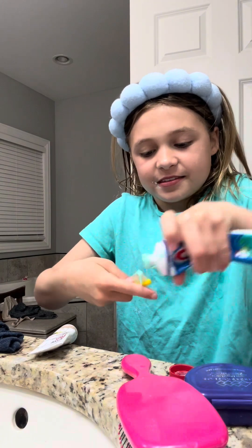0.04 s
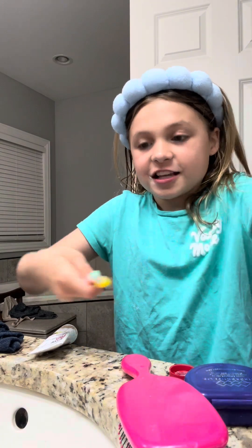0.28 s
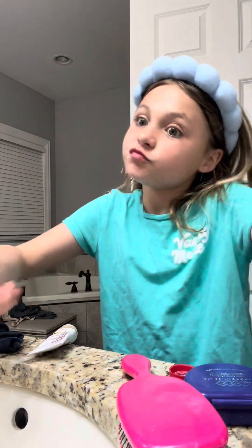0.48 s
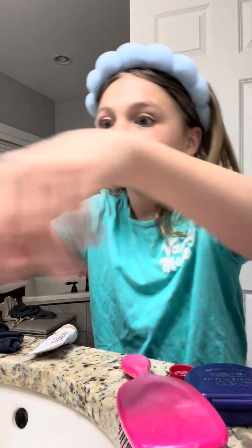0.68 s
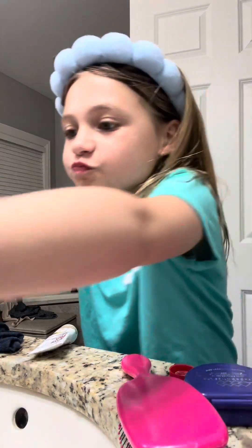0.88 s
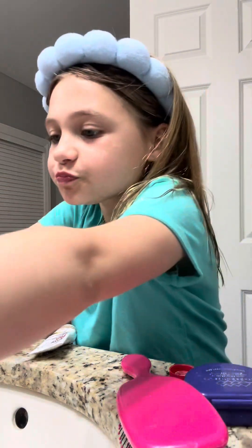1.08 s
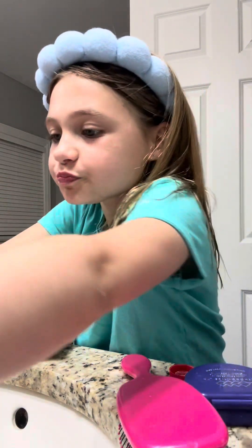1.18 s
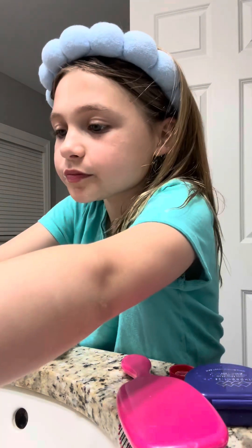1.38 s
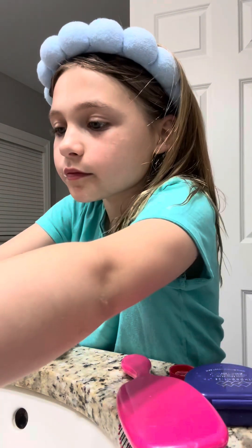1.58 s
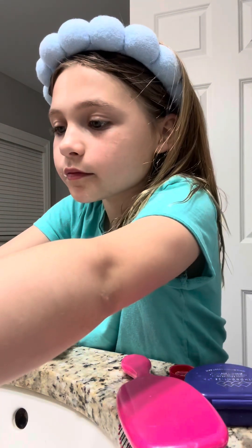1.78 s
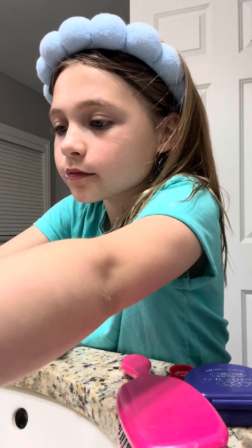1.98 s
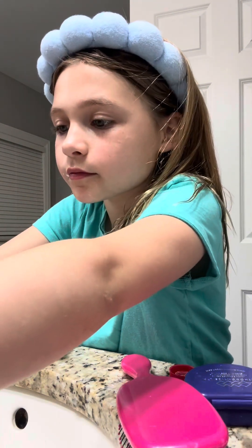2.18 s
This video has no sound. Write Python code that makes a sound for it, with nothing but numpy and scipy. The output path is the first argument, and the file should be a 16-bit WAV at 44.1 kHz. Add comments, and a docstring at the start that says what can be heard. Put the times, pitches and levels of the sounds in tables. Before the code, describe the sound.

Plastic items clatter on a stone bathroom counter: a faint click, a dull heavy thud, a sharp hard knock and scattered rattles, then quiet tap water hisses with soft drain gurgles. Close stereo microphones, hard reverberant room.

```python
"""A bathroom basin, with a stereo pair of microphones that feels the counter shake.
After one faint click something heavy is set down with a thud; then plastic clatters on the counter, with a
hard blow early in it: noise bursts and decaying modes. Low, dull bumps ring the cabinet, under the knocks
and once after the water runs. The tap opens into a splash and a thin, steady hiss of filtered noise; low,
hollow gurgles, most likely the drain, are wavering sines. The hard room rings after each impact; air rumbles."""
import sys
import numpy as np
from scipy import signal
from scipy.fft import rfft, irfft
from scipy.io import wavfile

SR = 44100
rng = np.random.default_rng(int(sys.argv[2]) if len(sys.argv) > 2 else 0)


def file_out(sig):
    """Save sig as 16-bit WAV at sys.argv[1]."""
    # one column per channel
    cols = np.atleast_2d(sig).T
    # limit, then scale
    lim = np.clip(cols, -1, 1)
    pcm = np.round(lim * 32767).astype(np.int16)
    wavfile.write(sys.argv[1], SR, pcm)


N = 97020
TIME = np.arange(N) / SR

# Heavy blows: a soft set-down with its dull contact noise, then a hard blow on the stone top
THUD_S, THUD_DB = 0.2442, -12
THUD_SCUFF_DB, THUD_SCUFF_HZ = -19.5, 1900
KNOCK_S = 0.4021
# Modes of the counter under the thud: [f/Hz, level/dB, t60/s]
COUNTER_MODES = [(141, -16, 0.15), (180.3, -20, 0.13), (356, -4.5, 0.029), (505, 1, 0.021),
                 (854, -6.5, 0.012)]
# Modes of the stone top under the knock: [f/Hz, level/dB, t60/s]
STONE_MODES = [(312, -18, 0.035), (935, 7.5, 0.0039), (1225, 8, 0.0036), (8070, -8, 0.0041)]
BUILD_CYCLES = 0.35  # time constant of a mode's swell, in its own cycles
# The whole counter booms, swelling and dying slowly: [t/s, level/dB]
BOOMS = [(0.246, -21.5), (0.404, -32.5), (0.696, -39.5)]
BOOM_HZ, BOOM_PEAK_S = 78.1, 0.026

# Plastic things touch the counter: [t/s, crack level/dB, hollow ring level/dB, crack f/Hz]
CLICKS = [(0.1431, -43.5, -87, 8160), (0.3679, -29, -25.5, 1202), (0.3722, -17, -49.5, 9900),
          (0.4027, -28, -20, 8000), (0.413, -16, -29, 7980), (0.4157, -21.5, -36, 4120),
          (.458, -21, -37.5, 8600), (0.4839, -24.5, -37.5, 6300), (0.525, -19.5, -30, 8240),
          (0.5413, -21.5, -33, 6100), (0.563, -30, -36.5, 5500), (0.6519, -21, -30.5, 3330),
          (0.6635, -29.5, -52, 5700), (0.684, -48, -38, 1140), (0.8339, -28.5, -40.5, 5960),
          (0.8937, -45.5, -49.5, 3100)]
# Colour of the cracks: [f/Hz, level/dB]
CRACK_COLOUR = [(200, -10.5), (600, 1.5), (1300, 5), (3300, 3), (8200, 0), (15000, -3.5)]
CRACK_T60_S, BURST_ATTACK_S = 0.015, 0.00038
# Hollow modes of the plastic: [f/Hz, level/dB, t60/s]
PLASTIC_MODES = [(396, -4, 0.06), (950, -9, 0.04), (1045, -6.5, 0.047), (1248, 0, 0.024),
                 (1810, -10, 0.038)]
# Snaps of a small hard piece, perhaps a cap: [t/s, level/dB]
SNAPS = [(.3727, -21), (.414, -32.5)]
# Bright modes of that piece: [f/Hz, level/dB, t60/s]
CAP_MODES = [(3575, -3, 0.03), (4840, -3, .022), (5440, -0.5, 0.0072)]
# Low, dull bumps of the cabinet: [t/s, level/dB]
BUMPS = [(.285, -32), (.41, -33.5), (.527, -31.5), (.695, -37.5), (.908, -42.5), (1.468, -44.5)]
# Modes of the cabinet: [f/Hz, level/dB, t60/s]
CABINET_MODES = [(68.5, -7.5, 0.4), (115.2, -4.5, 0.36), (140.25, -4.5, .5), (179, -0.5, 0.12),
                 (302, -13, 0.28)]

# Level of the tap's jet over time, on top of JET_DB: [t/s, level/dB]
FLOW = [(1.2, -2.5), (1.6, 1.5), (1.9, -0.5), (2.2, -3)]
# Colour of the jet's hiss: [f/Hz, level/dB]
JET_COLOUR = [(2000, -28), (4400, -19), (6500, -6.5), (8000, -0.5), (9200, 8), (10400, -5), (11800, 3),
              (13600, 3.5), (15500, -6.5)]
# Colour of the stream landing in the basin: [f/Hz, level/dB]
SPLASH_COLOUR = [(200, -11.5), (650, -17), (1050, -0.5), (1300, 8), (1480, 8), (1800, -7.5), (2150, -3),
                 (4000, -26)]
# Placing of the splash in the stereo image: [f/Hz, left-right level/dB]
SPLASH_PAN = [(800, -1), (1300, 6.5), (2200, 15)]
JET_DB, TAP_OPEN_S, TAP_RISE_S = -50.5, 1.177, 0.02
SPLASH_DB, SPLASH_START_S, SPLASH_RISE_S = -55, 1.132, 0.069
# The stream spits: [t/s, level/dB, f/Hz]
SPITS = [(1.605, -45.5, 3800), (1.607, -48.5, 5700), (1.686, -50, 3900), (1.752, -48, 2740)]
SPIT_T60_S = 0.039

# Hollow swells, as of water gurgling in the drain:
# [t/s, length/s, low resonance level/dB, high resonance level/dB]
GURGLES = [(1.473, 0.092, -45.5, -51), (1.588, 0.047, -47, -44), (1.614, 0.14, -41.5, -58),
           (1.747, 0.037, -51, -42), (1.772, 0.245, -54.5, -57)]
DRAIN_LOW_HZ, DRAIN_HIGH_HZ = 208, 336.6
GURGLE_RISE = 0.07  # share by which the pitch climbs through each gurgle

# Decay of the bathroom: [f/Hz, t60/s]
ROOM_T60 = [(100, 0.4), (400, 0.54), (3500, 0.62), (15000, 0.58)]
# Colour of the bathroom's response: [f/Hz, level/dB]
ROOM_COLOUR = [(100, -3), (550, -3.5), (1200, -5), (15000, -9.5)]
ROOM_DB, EARLY_DB, EARLY_T60_S = -2.5, -3, 0.18
BLOWS_WET_DB = -5.5  # blows reach the microphones mostly through the counter, so they stir the room less

# Colour of the air in the room: [f/Hz, level/dB]
RUMBLE_COLOUR = [(25, -29), (50, 2), (80, -10.5), (125, -2.5), (165, -13), (205, -9.5), (260, -14),
                 (360, -7), (520, -27), (3000, -48.5)]
# Level of that air over time: [t/s, level/dB]
RUMBLE_LEVEL = [(.2, -52), (.9, -51.5), (2.2, -53.5)]

# Balance of the two microphones: [f/Hz, left-right level/dB]
MIC_PAN = [(700, 0), (1200, 0), (1700, -1), (2600, -11.5), (4400, -13.5), (6000, -9.5), (7600, -0.5)]
# Phase between the microphones: [f/Hz, left lead/rad]
MIC_PHASE = [(390, 0), (600, -1.89), (1400, -0.06), (4200, -3.5), (7200, -0.6), (8300, 0.5), (9100, 1.5),
             (11000, 4), (15500, 8.5)]
# The shaking counter rocks the microphones: [f/Hz, right lead/rad]
ROCK = [(45, 0), (170, 1.1), (390, 1.4), (560, 0.052)]
# Width of diffuse sound at the microphones: [f/Hz, side-mid level/dB]
SPREAD = [(100, -29.5), (400, -1), (2500, 1.5), (5000, -3.5), (8000, -26.5)]
CUTOFF_HZ = 17200  # the top is 60 dB down from here up


def blows():
    """The thud and the hard knock set the modes of counter and stone top ringing."""
    return struck([(THUD_S, THUD_DB)], COUNTER_MODES) + struck([(KNOCK_S, 0)], STONE_MODES)


def booms():
    """The deep note of the whole counter, one sine that swells before it dies."""
    out, t = np.zeros((2, N)), TIME[:SR // 2]
    swell = (t / BOOM_PEAK_S * np.exp(1 - t / BOOM_PEAK_S)) ** 3
    boom = swell * np.sin(2 * np.pi * BOOM_HZ * t + rocking(BOOM_HZ))
    for s, db in BOOMS:
        add(out, s, from_db(db) * boom)
    return out


def scuff():
    """Dull contact noise of the set-down: a resonant burst with its treble rolled off."""
    burst = bursts([(THUD_S, THUD_SCUFF_DB, THUD_SCUFF_HZ)], CRACK_T60_S, ring_db=11)
    b, a = signal.butter(1, 2 * THUD_SCUFF_HZ, fs=SR)
    return signal.lfilter(b, a, burst)


def clatter():
    """Each touch of plastic is a noisy crack plus the ring of a hollow body."""
    crack_rows = [(s, crack_db, hz) for s, crack_db, _, hz in CLICKS]
    hollow_rows = [(s, hollow_db) for s, _, hollow_db, _ in CLICKS]
    cracks = colour(bursts(crack_rows, CRACK_T60_S, ring_db=3), CRACK_COLOUR)
    return cracks + struck(hollow_rows, PLASTIC_MODES, scatter_db=5)


def snaps():
    """A small hard piece rings in a few bright modes."""
    return struck(SNAPS, CAP_MODES)


def bumps():
    """Low bumps set the cabinet's modes ringing, each a little differently every time."""
    return struck(BUMPS, CABINET_MODES, scatter_db=3)


def tap(flutter_db=1.47):
    """The aerator hisses with a slight flutter and the stream lands softly in the basin."""
    opened = np.clip((TIME - TAP_OPEN_S) / TAP_RISE_S, 0, 1)
    jet_gain = from_db(JET_DB + in_time(FLOW) + flutter_db * drift(59.95))
    jet = rms_one(colour(diffuse(), JET_COLOUR)) * opened * jet_gain
    wetted = np.clip((TIME - SPLASH_START_S) / SPLASH_RISE_S, 0, 1)
    splash = rms_one(pan(colour(diffuse(), SPLASH_COLOUR), SPLASH_PAN)) * wetted * from_db(SPLASH_DB)
    return jet + splash


def spits():
    """The stream spits: short noise bursts, each with a sharp resonance."""
    return bursts(SPITS, SPIT_T60_S, ring_db=11.5, sharpness=21)


def drain(waver=0.03, flutter_db=2):
    """Each gurgle swells two wavering air resonances of the drain, which climb as the water rises."""
    out = np.zeros(N)
    for s, length, *levels in GURGLES:
        progress = np.clip((TIME - s) / length, 0, 1)
        for hz, db in zip((DRAIN_LOW_HZ, DRAIN_HIGH_HZ), levels):
            pitch = hz * (1 + GURGLE_RISE * (progress - 0.5) + waver * drift(90))
            swell = np.sqrt(np.abs(np.sin(np.pi * progress)))
            gain = from_db(db + flutter_db * drift(70))
            out += swell * gain * np.sin(2 * np.pi * np.cumsum(pitch) / SR)
    return out


def bathroom(x):
    """Hard walls: early reflections, then a noise tail in which each band has its own decay."""
    noise, tail = diffuse(), 0
    edges = np.geomspace(40, 18000, 10)
    for low, high in zip(edges, edges[1:]):
        band = signal.sosfilt(signal.butter(2, [low, high], "band", fs=SR, output="sos"), noise)
        tail = tail + band * fade(TIME, at_hz(ROOM_T60, np.sqrt(low * high)))
    early = diffuse() * fade(TIME, EARLY_T60_S)
    mixed = from_db(ROOM_DB) * rms_one(tail) + from_db(EARLY_DB) * rms_one(early)
    response = colour(mixed, ROOM_COLOUR) / np.sqrt(N)
    onset = np.clip(TIME / 0.0013, 0, 1)  # the response fades in over 1.3 ms
    return signal.fftconvolve(x, response * onset, axes=1)[:, :N]


def room_air():
    """Low rumble of air from all around, as coloured diffuse noise."""
    return rms_one(colour(diffuse(), RUMBLE_COLOUR)) * from_db(in_time(RUMBLE_LEVEL))


def struck(hits, modes, scatter_db=0):
    """Each hit rings every mode of a body, its strength scattered at random; stereo."""
    out, t = np.zeros((2, N)), TIME[:SR // 2]
    for k, (hz, mode_db, t60) in enumerate(modes):
        build = 1 - np.exp(-t * hz / BUILD_CYCLES)
        sign = (-1) ** k  # neighbouring modes start in opposite directions
        ring = sign * np.sin(2 * np.pi * hz * t + rocking(hz)) * fade(t, t60) * build
        for s, db in hits:
            add(out, s, from_db(db + mode_db + scatter_db * rng.standard_normal()) * ring)
    return out


def bursts(rows, t60, ring_db, sharpness=6):
    """Short noise bursts (t/s, level/dB, f/Hz), each with a resonance of its own added; mono."""
    out, t = np.zeros(N), TIME[:SR // 8]
    for s, db, hz in rows:
        envelope = fade(t, t60) * (1 - np.exp(-t / BURST_ATTACK_S))
        burst = from_db(db) * rng.standard_normal(len(t)) * envelope
        b, a = signal.iirpeak(hz, sharpness, fs=SR)
        add(out, s, burst + from_db(ring_db) * signal.lfilter(b, a, burst))
    return out


def rocking(hz):
    """Phase of left and right microphone on the shaking counter, in radians."""
    return at_hz(ROCK, hz) * np.array([[0], [1]])


def diffuse():
    """Stereo noise as it arrives from all around, its width set by frequency."""
    mid, side = rng.standard_normal((2, N))
    side = colour(side, SPREAD)
    return rms_one(np.array([mid + side, mid - side]))


def pan(x, points):
    """Tilt a stereo pair to the left or right by frequency, half the difference on each side."""
    return np.array([colour(x[0], points, 0.5), colour(x[1], points, -0.5)])


def colour(x, points, share=1):
    """Filter by a share of a table of f/Hz, level/dB, without phase shift."""
    size = 2 * x.shape[-1]
    hz = np.arange(size // 2 + 1) * SR / size
    return irfft(rfft(x, size) * from_db(share * at_hz(points, hz)), size)[..., :size // 2]


def drift(rate):
    """Random curve through normal values of spread 1, with rate of them per second."""
    knots = rng.standard_normal(1000)
    return np.interp(TIME * rate, np.arange(len(knots)), knots)


def fade(t, t60):
    """Exponential decay by 60 dB in t60 seconds."""
    return np.exp(-np.log(1000) * t / t60)


def add(out, s, sound):
    """Mix a sound in at time s, in seconds."""
    i = int(np.clip(s * SR, 0, N - 1))
    out[..., i:i + sound.shape[-1]] += sound[..., :N - i]


def at_hz(points, hz):
    """Read a table on a log-frequency axis."""
    f, v = np.transpose(points)
    return np.interp(np.log(np.maximum(hz, 1)), np.log(f), v)


def in_time(points):
    """Read a curve at every sample."""
    return np.interp(TIME, *np.transpose(points))


def from_db(db):
    """Decibels to gain."""
    return 10 ** (np.asarray(db) / 20)


def rms_one(x):
    """Scale to unit power."""
    return x / np.sqrt(np.mean(x ** 2) + 1e-20)


def scene():
    """Impacts and spits stir the room; tap, drain and air are heard without added reverberation."""
    heavy = blows()
    close = clatter() + snaps() + scuff() + booms() + bumps() + spits()
    room = bathroom(close + from_db(BLOWS_WET_DB) * heavy)
    return heavy + close + room + tap() + drain() + room_air()


def record(dry):
    """The two microphones differ in colour and phase; the deepest bass and the top are cut."""
    left, right = pan(dry, MIC_PAN)
    hz = np.arange(N + 1) * SR / (2 * N)
    right = irfft(rfft(right, 2 * N) * np.exp(-1j * at_hz(MIC_PHASE, hz)))[:N]
    pair = colour(np.array([left, right]), [(25, -18), (42, 0)])  # bass cut: f/Hz, level/dB
    return signal.sosfilt(signal.cheby2(12, 60, CUTOFF_HZ, fs=SR, output="sos"), pair)


dry = scene()
out = record(dry)
file_out(out)
```